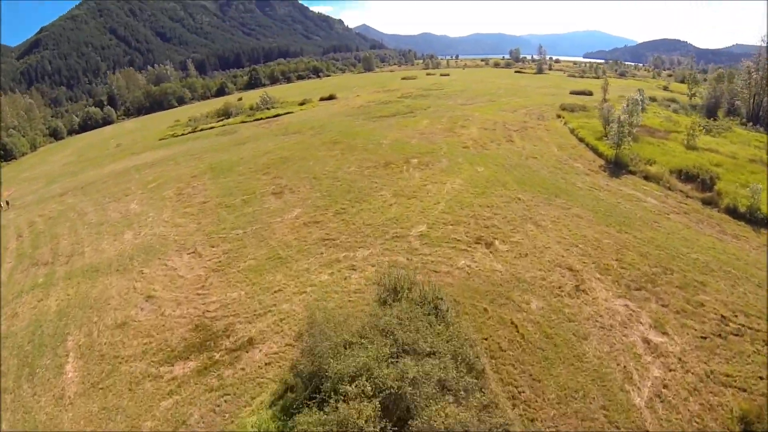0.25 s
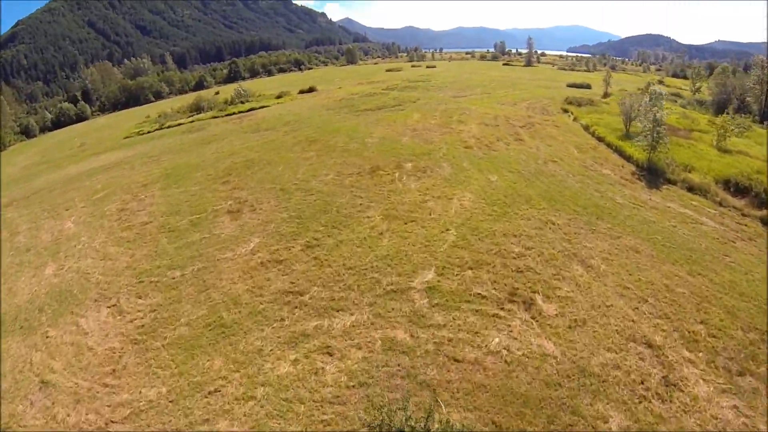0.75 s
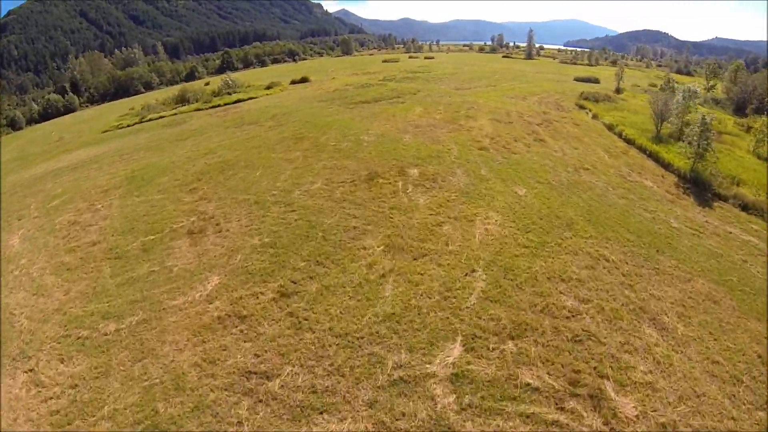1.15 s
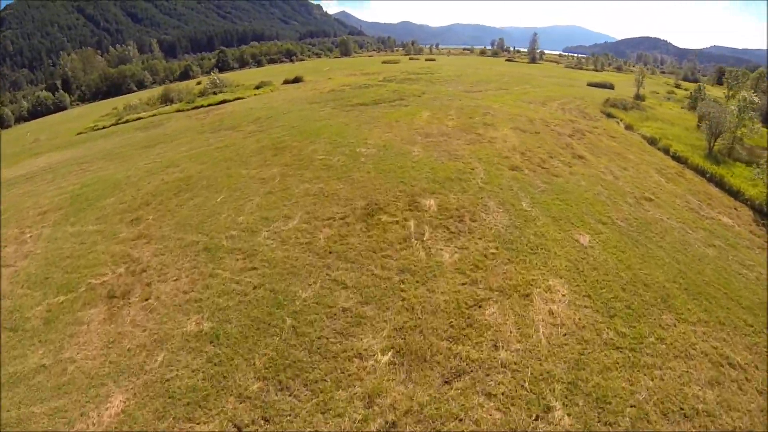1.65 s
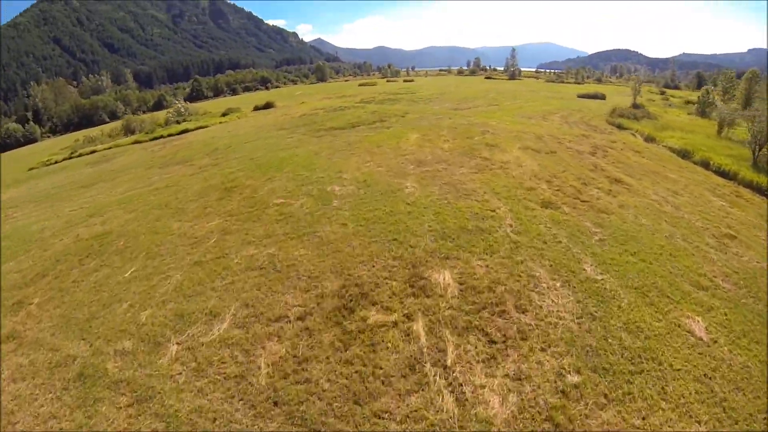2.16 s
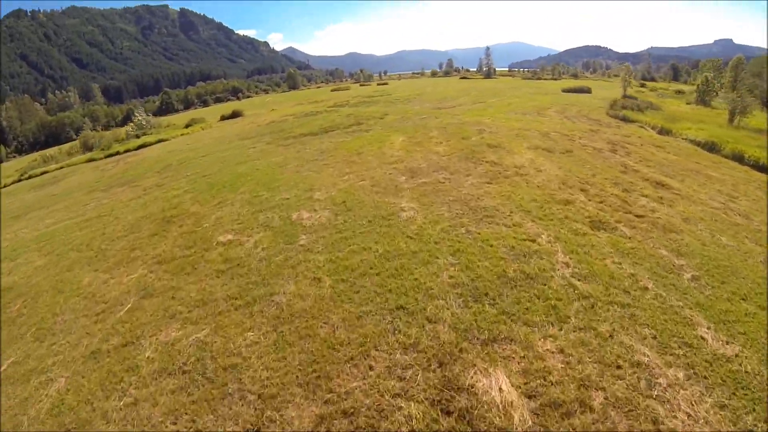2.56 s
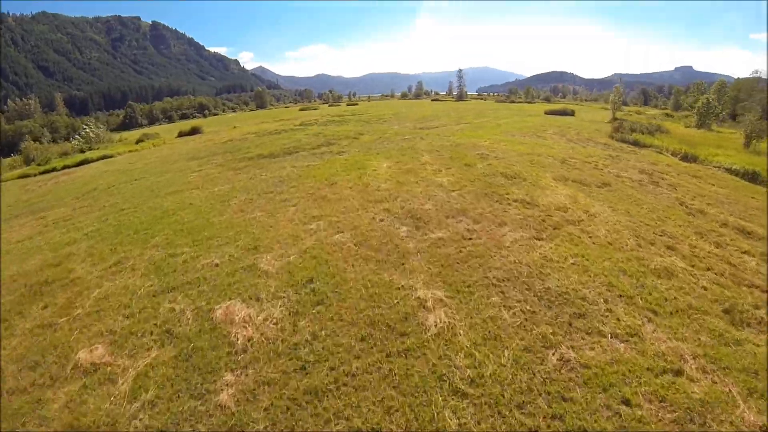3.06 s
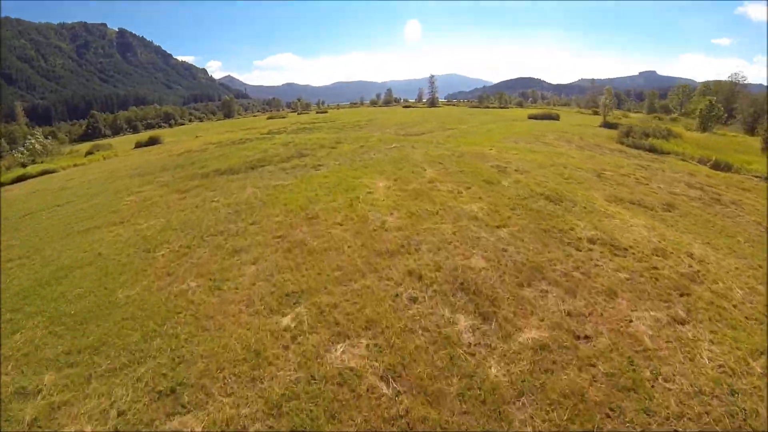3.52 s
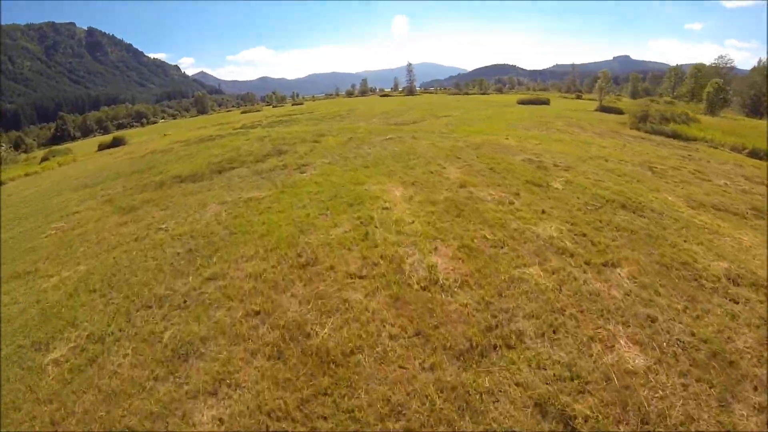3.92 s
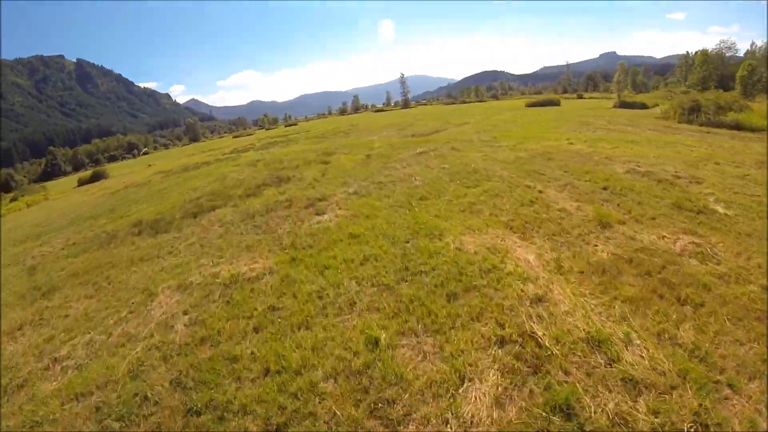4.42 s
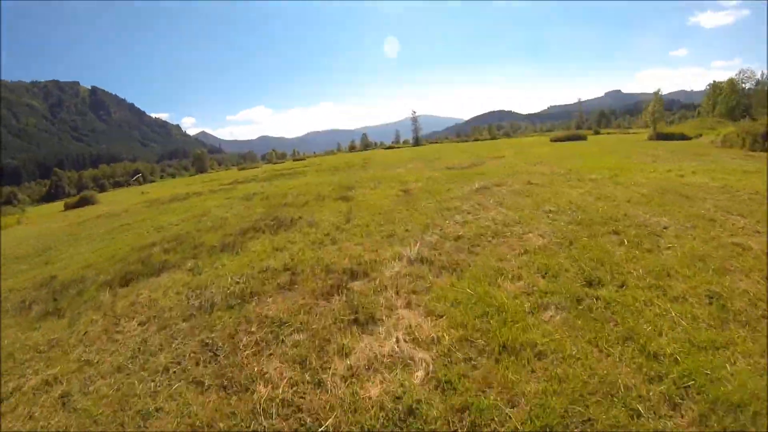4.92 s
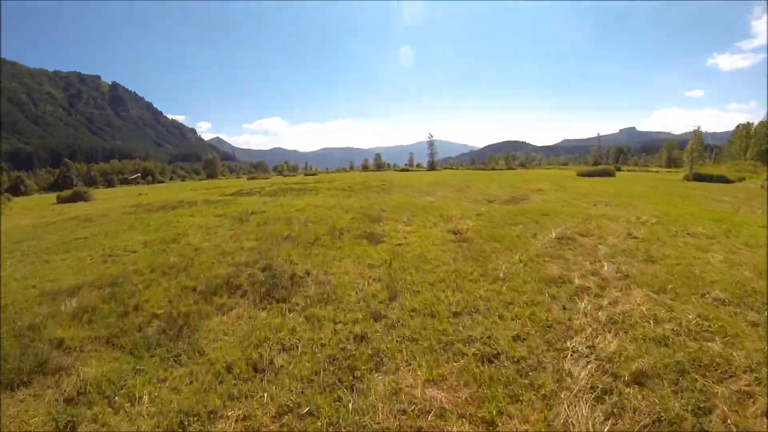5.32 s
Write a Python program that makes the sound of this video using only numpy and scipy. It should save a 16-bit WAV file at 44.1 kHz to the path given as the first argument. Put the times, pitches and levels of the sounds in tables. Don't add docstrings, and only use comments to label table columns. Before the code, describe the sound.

Rushing air rumbles steadily over a microphone above an open field, joined by sparse clicks, then a hard clattering burst of the loose mount.

```python
import sys
import numpy as np
from scipy import signal
from scipy.fft import rfft, irfft, next_fast_len
from scipy.io import wavfile

SR = 44100
rng = np.random.default_rng(int(sys.argv[2]) if len(sys.argv) > 2 else 0)


def boost_factor(decibels):
    exponent = np.asarray(decibels, float) / 20
    return 10 ** exponent


def digitize_waveform(pressure):
    field = np.atleast_2d(pressure).T
    bounded = np.clip(field, -1, 1)
    quanta = np.round(bounded * 32767).astype(np.int16)
    wavfile.write(sys.argv[1], SR, quanta)


N = 246145

# (frequency [Hz], level [dB], t60 [s])
BODY_MODES = [(1232, -8, 0.031), (1590, 1.5, 0.018), (1750, -6, .01), (2012, -5, 0.032),
              (2410, -12.5, 0.019)]


def wind():
    # (time [s], speed as hiss level [dB], buffeting by big eddies [dB])
    stream = [(0.0, -30.5, 0.5), (0.29, -29.5, 0), (0.48, -31, -1.5), (1.13, -30.5, 0), (1.55, -34.5, -1),
              (1.8, -33, -2), (2.1, -30.5, 1), (2.28, -34, 1.5), (3.39, -34.5, 2), (3.79, -33, 0),
              (4.01, -36.5, 0), (4.65, -39, 0.5), (4.8, -39, -1), (5.02, -44.5, 1), (5.58, -39.5, 0)]
    times, speed, buffet = np.transpose(stream)
    t = np.arange(N) / SR
    speed = np.interp(t, times, speed - speed.mean())
    buffet = np.interp(t, times, buffet)
    size = next_fast_len(N + SR // 4)
    hz = np.maximum(np.arange(size // 2 + 1) * SR / size, 1)
    noise = rfft(rng.standard_normal(size))
    flutter = 0.27 * drift(6.2) + 0.37 * drift(45.0)
    return eddies(noise, hz, size, speed, buffet, flutter) + seam(noise, hz, size, speed, flutter)


def eddies(noise, hz, size, speed, buffet, flutter):
    # (mean level [dB], share of speed [dB/dB], share of buffeting [dB/dB],
    # own surge [dB], surge rate [1/s])
    eddy_sizes = [
        (-19, 0.29, .9, 1.5, 3.0),
        (-19.5, 0.086, .7, 0.5, 4.0),
        (-20.5, 0.58, .3, 1.5, 3.3),
        (-36, 0.99, .05, 1, 2),
    ]
    # (time [s], half width [s], level [dB], centre frequency [Hz])
    gusts = [(.1, 0.23, -3.5, 187.6), (.05, .1, 1, 40.1), (.42, 0.11, 3, 605), (.75, 0.3, -2, 172),
             (1.08, .1, 1.5, 350), (1.0, .15, -2.5, 3500), (1.28, 0.15, 6.5, 333), (2.25, 0.13, -4, 402),
             (2.55, .08, -5, 149.4), (1.6, 0.24, -3, 500), (1.87, 0.07, 7, 120.6), (2.3, 0.29, 1, 40.5),
             (2.4, 0.14, -2, 454), (2.83, .05, 2.5, 705), (2.97, 0.046, 8, 800), (3.05, 0.042, -3.5, 509),
             (3.28, 0.043, 4.5, 130), (3.3, 0.25, -6, 35.6), (3.68, 0.1, 4, 331), (3.78, 0.046, -11, 120),
             (4.07, 0.021, -2.5, 600), (4.27, .03, -6, 496), (4.62, .05, -8.5, 45.5),
             (4.742, 0.073, -13, 149), (4.879, .04, 7.5, 159.7), (5.0, 0.055, -6.5, 152.5),
             (5.1, 0.046, 6, 147), (5.18, 0.035, 0, 121.7), (.75, .25, -5, 25), (1.75, .2, 4, 24.8),
             (5.56, 0.067, 5.5, 129.5)]
    gust_octaves = 0.72
    t = np.arange(N) / SR
    coarse_t = t[::64]
    spectrum = noise * boost_factor(eddy_spectrum_db(hz))
    gust, flicker = drift(7.7), drift(5.0)
    layers = np.zeros((4, N))
    for centre_hz in 14 * 2 ** np.arange(0, 10.5, .5):
        window = np.cos(np.pi * np.clip(np.log2(hz / centre_hz), -.5, .5)) ** 2
        puffs_db = np.zeros(len(coarse_t))
        for s, width, db, gust_hz in gusts:
            nearness = bell(np.log2(centre_hz / gust_hz) / gust_octaves)
            puffs_db += db * nearness * bell((coarse_t - s) / width)
        small = np.clip(np.log2(centre_hz / 250) / 2.9, 0, 1)
        fine = max(np.log2(centre_hz / 3000), 0)
        slice_db = 0.42 * gust + small * 2.5 * flutter + np.interp(t, coarse_t, puffs_db)
        slice_db += fine * (0.29 * speed + 0.8 * flicker)
        layer = np.searchsorted([90, 260, 950], centre_hz)
        layers[layer] += irfft(spectrum * window, size)[:N] * boost_factor(slice_db)
    out = np.zeros(N)
    for (mean_db, by_speed, by_buffet, surge_db, rate), layer in zip(eddy_sizes, layers):
        level_db = mean_db + by_speed * speed + by_buffet * buffet + surge_db * drift(rate)
        out += boost_factor(level_db) * rms_one(layer)
    return out


def eddy_spectrum_db(hz):
    # (frequency [Hz], density [dB per Hz])
    turbulence = [(15, -5), (30, 3.5), (80, -5.5), (230, -6.5), (490, -12.5), (750, -18), (1200, -29),
                  (2000, -35), (3300, -47), (4500, -55), (6000, -66.5), (7200, -73), (10000, -81.5),
                  (15000, -85.5)]
    # (frequency [Hz], width [Hz], lift [dB])
    shell_peaks = [(1600, 310, 1), (2200, 230, -1.5), (3710, 240, 2.5), (5200, 400, 3.5), (6520, 200, 5),
                   (8500, 1100, 5.5), (11700, 700, 5)]
    corner_hz, density_db = np.transpose(turbulence)
    shape_db = np.interp(np.log(hz), np.log(corner_hz), density_db)
    for peak_hz, width_hz, peak_db in shell_peaks:
        shape_db = shape_db + peak_db / (1 + (2 * (hz - peak_hz) / width_hz) ** 2)
    top_hz = 12800
    return shape_db - 180 * np.clip(hz / top_hz - 1, 0, .3)


def seam(noise, hz, size, speed, flutter):
    # (time [s], rise [dB], width [s])
    whistles = [
        (2.06, 13, 0.097),
        (2.24, 14, 0.03),
    ]
    seam_hz, seam_width_hz = 10080, 2000
    t = np.arange(N) / SR
    band = np.exp(-(2 * (hz - seam_hz) / seam_width_hz) ** 2)
    whistle = irfft(noise * band, size)[:N]
    level_db = -80 + 1.2 * speed + 1.2 * flutter
    for s, rise_db, width in whistles:
        level_db = level_db + rise_db * bell((t - s) / width)
    return boost_factor(level_db) * rms_one(whistle)


def knocks():
    # (time [s], peak [dB], ring frequency [Hz], contact time [ms])
    blows = [(1.438, -8, 525, 1.7), (2.569, -6.5, 710, 2.2), (2.811, -5.5, 560, 2.1), (2.913, -7, 587, 4.2),
             (3.539, -7.5, 540, 1.2), (3.686, -8.5, 641, 4), (3.965, -4.5, 494, 2.7), (3.975, -2, 506, 1.3),
             (3.984, -3.5, 760, 4.2), (3.993, -3.5, 500, 3), (4.012, -3, 540, 1.8), (4.364, -7.5, 525, 2.9),
             (4.372, -1.5, 480, 3.7), (4.458, -6, 514, 2.3), (4.64, -10, 525, 2.2), (4.657, -2, 547, 1.9),
             (4.676, 7.5, 937, 1.6), (4.694, -2.5, 497, 3), (4.708, -3.5, 534, 4.9), (4.73, -7, 530, 4.6),
             (4.758, -4, 540, 1.8), (4.764, -1, 570, 1.77), (4.806, -9.5, 540, 1.5), (5.135, -20, 503, 2.6),
             (5.222, -6.5, 504, 1.8), (5.317, -11.5, 540, 1.4)]
    out = np.zeros(N)
    for s, db, hz, ms in blows:
        force = dull(contact(ms, touch=0.03), 1585)
        thud = ring(force, hz, 11 / hz)
        thud += .5 * ring(force, 1.49 * hz, 11 / hz) + 0.13 * ring(force, 2.3 * hz, 9 / hz)
        thud += 0.16 * sum(ring(force, body_hz, t60) for body_hz, _, t60 in BODY_MODES)
        add(out, s - .001, boost_factor(db - 4.5) * thud / np.max(np.abs(thud)))
    return out


def ticks():
    # (frequency [Hz], level [dB], t60 [s])
    rim_modes = [(2780, -6, 0.0072), (3330, -13, .008), (3545, 8.5, 0.022), (3950, 6.5, 0.012),
                 (4530, -4, 0.011), (4760, -1, 0.012), (5200, -18, .006)]
    # (frequency [Hz], level [dB], t60 [s])
    snap_modes = [(7040, -3.5, 0.0021), (8600, 1.5, .003), (9650, -3.5, 0.0057), (11300, -1, .0025),
                  (13000, -4, .0025), (14900, -16, .0025)]
    out = np.zeros(N)
    for s, rim_db, body_db, snap_db in strikes():
        force = contact(0.93, touch=1.2)
        snap_top_hz = 15800 + 120 * min(snap_db + 34, 0)
        groups = [(BODY_MODES, body_db + 6.5, 3000),
                  (rim_modes, rim_db - 1.0, 6200),
                  (snap_modes, snap_db + 10, snap_top_hz)]
        for modes, level_db, top_hz in groups:
            rung = sum(boost_factor(db + rng.normal(0, 0.58)) * ring(force, hz, t60) for hz, db, t60 in modes)
            rung = dull(rung, top_hz)
            add(out, s + .0006, boost_factor(level_db) * rung / np.max(np.abs(rung)))
    return out


def strikes():
    # (time [s], rim [dB], body [dB], snap [dB])
    hard = [(3.0819, -29, -27, -59), (3.354, -24, -18, -53), (3.78, -27.5, -21.5, -61),
            (3.9135, -29.5, -22, -61), (4.1586, -33.5, -28.5, -68), (4.3817, -31, -30, -48),
            (4.4733, -37, -23, -73), (4.5849, -17.5, -13.5, -54.5), (4.661, -32, -32, -58),
            (4.6661, -20.5, -16, -58), (4.6764, -29, -16, -47.5), (4.6798, -28, -25, -54.5),
            (4.7066, -22, -29, -61.5), (4.7134, -25, -22, -47), (4.7195, -8.5, -16.5, -33),
            (4.7587, -44, -27, -70), (5.2914, -36.5, -40, -72.5), (5.3118, -36.5, -40, -60.5),
            (5.4073, -42, -22.5, -70), (5.4423, -35.5, -31, -68.5), (5.4708, -30, -33, -63.5),
            (5.495, -48, -43, -57.5), (5.5223, -37, -31, -58.5)]
    # (time [s], rim [dB])
    light = [(.207, -45), (1.3894, -37), (1.4594, -48), (2.8444, -35), (2.8794, -40), (3.29, -49.5),
             (3.7404, -43), (3.8302, -42), (4.1737, -43), (4.2374, -47), (4.2602, -47), (4.4402, -46.5),
             (4.4554, -38.5), (4.6068, -40), (4.639, -48), (4.6544, -45), (4.6964, -39), (4.7388, -32),
             (4.7734, -49), (4.8014, -55), (4.8625, -47), (4.8966, -41), (5.027, -49), (5.117, -49),
             (5.1454, -45), (5.1816, -43), (5.449, -32.5), (5.483, -48)]
    bounce_s, loss_db, snap_loss_db = .0095, 13.5, 14
    bounces = [(s + bounce_s, rim - loss_db, body - loss_db, snap - snap_loss_db)
               for s, rim, body, snap in hard]
    taps = [(s, rim, rim + 8, -62.5 + .2 * (rim + 44)) for s, rim in light]
    return list(hard) + bounces + taps


def scrapes():
    # (time [s], half width [s], level [dB])
    strokes = [
        (2.835, .025, -33),
        (2.955, .015, -32),
        (3.985, .018, -29.5),
        (4.365, 0.022, -35),
        (4.672, 0.0099, -23),
        (4.721, 0.02, -29),
        (4.765, 0.009, -29.5),
        (5.46, 0.019, -36.5),
    ]
    grit_per_s = 2900
    t = np.arange(N) / SR
    hits = rng.random(N) < grit_per_s / SR
    grit = hits * rng.standard_normal(N) * boost_factor(1.5 * rng.exponential(1, N)) + 1e-18
    band = signal.butter(2, [850, 2100], "band", fs=SR, output="sos")
    rasp = rms_one(dull(signal.sosfilt(band, grit), 2600))
    return sum(boost_factor(db) * bell((t - s) / width) for s, width, db in strokes) * rasp


def contact(ms, touch):
    t = np.arange(SR // 20) / (ms * 1e-3 * SR)
    force = rng.standard_normal(len(t)) * (t + touch) * np.exp(-t)
    force[0] = 4.7 * touch * ms ** .5
    return force / np.sqrt(np.sum(force ** 2))


def ring(force, hz, t60):
    radius, angle = boost_factor(-60 / (t60 * SR)), 2 * np.pi * hz / SR
    return signal.lfilter([0, np.sin(angle)], [1, -2 * radius * np.cos(angle), radius * radius], force)


def dull(x, hz):
    return signal.sosfilt(signal.butter(6, min(hz, 20000), fs=SR, output="sos"), x)


def drift(rate):
    pole = np.exp(-32 * np.pi * rate / SR)
    noise = rng.standard_normal(N // 16 + 3002)
    slow = signal.lfilter([1], [1, -2 * pole, pole * pole], noise)[3000:]
    return np.interp(np.arange(N) / 16, np.arange(len(slow)), rms_one(slow))


def bell(x):
    return np.exp(-x ** 2)


def rms_one(x):
    return x / np.sqrt(np.mean(x ** 2) + 1e-20)


def add(out, s, sound):
    i = round(s * SR)
    out[i:i + len(sound)] += sound[:N - i]


def scene():
    return (wind() + ticks() + knocks() + scrapes())[None]


def band_limit(x):
    return signal.sosfilt(signal.butter(12, 15200, fs=SR, output="sos"), x)


def record(dry):
    duck_s, duck_db = 4.72, -4
    attack_s, hold_s, release_s = 0.12, 0.16, 0.043
    corners = duck_s + np.cumsum([0, attack_s, hold_s, release_s])
    ducking = np.interp(np.arange(N) / SR, corners, [0, 1, 1, 0])
    ducked = dry * boost_factor(duck_db * ducking)
    limited = ducked / (1 + (ducked / .99) ** 6) ** (1 / 6)
    return band_limit(limited)


dry = scene()
out = record(dry)
digitize_waveform(out)
```